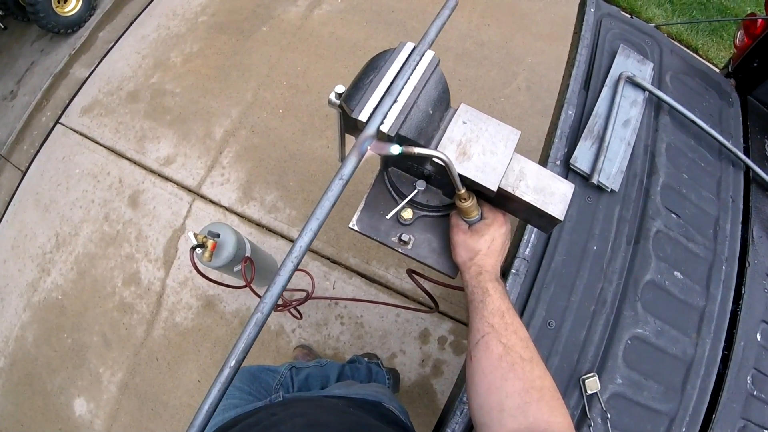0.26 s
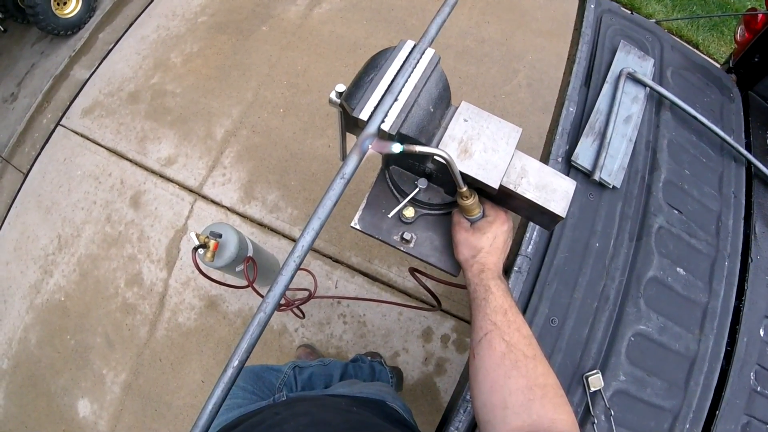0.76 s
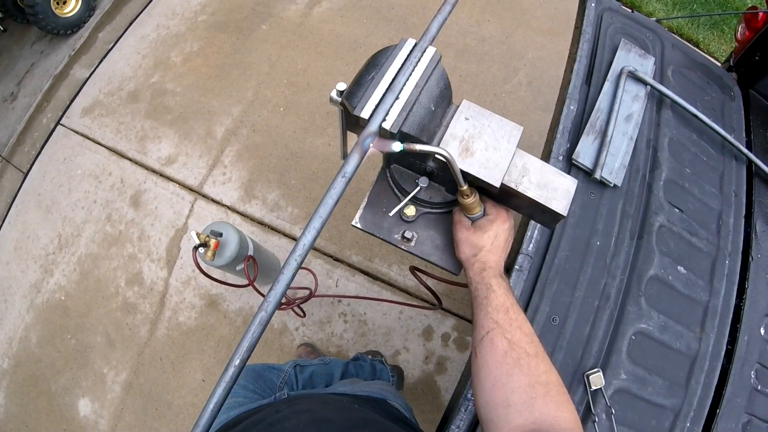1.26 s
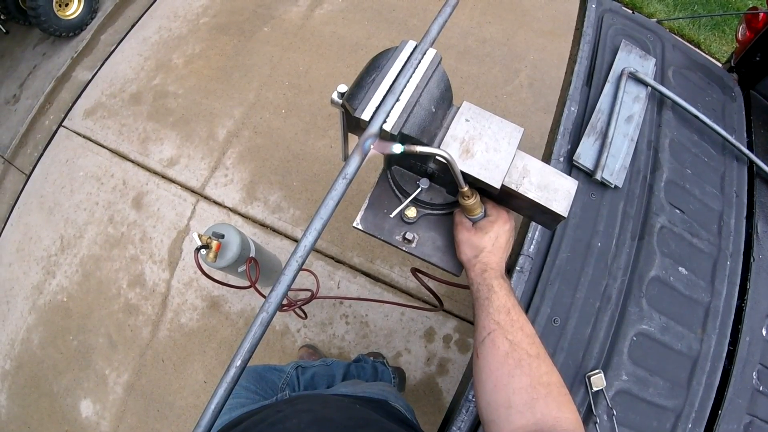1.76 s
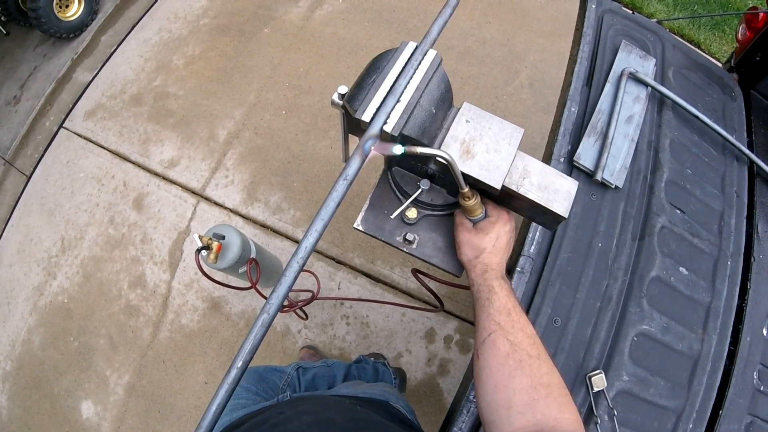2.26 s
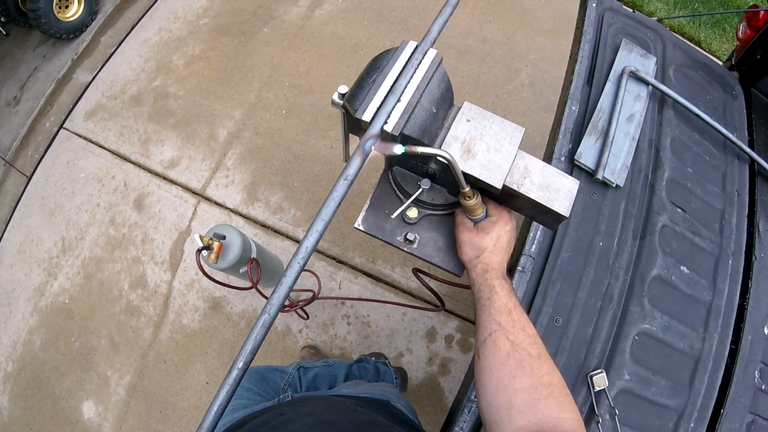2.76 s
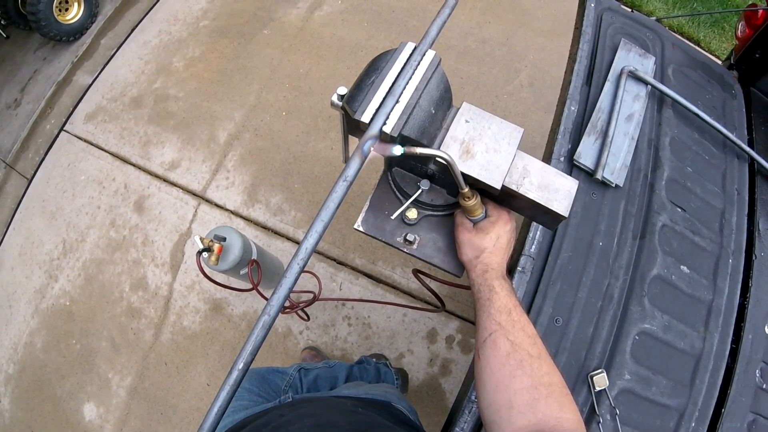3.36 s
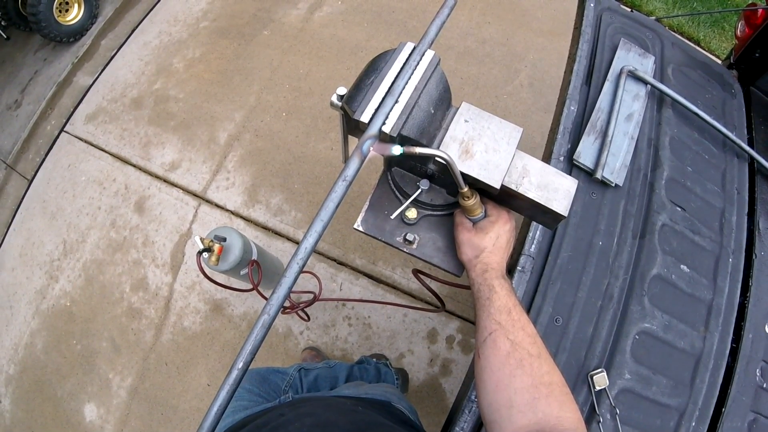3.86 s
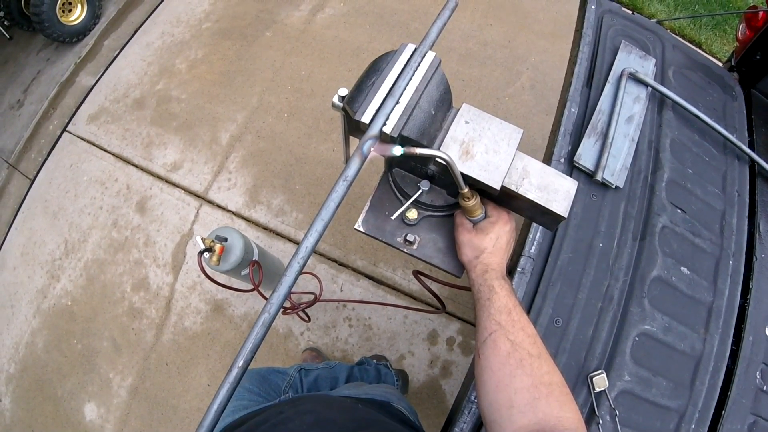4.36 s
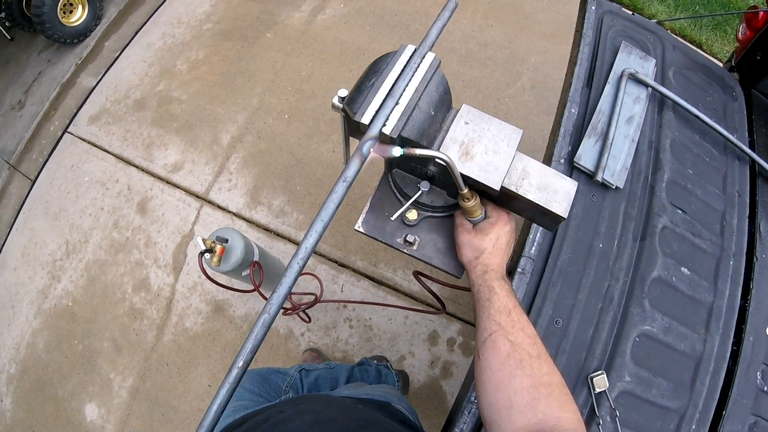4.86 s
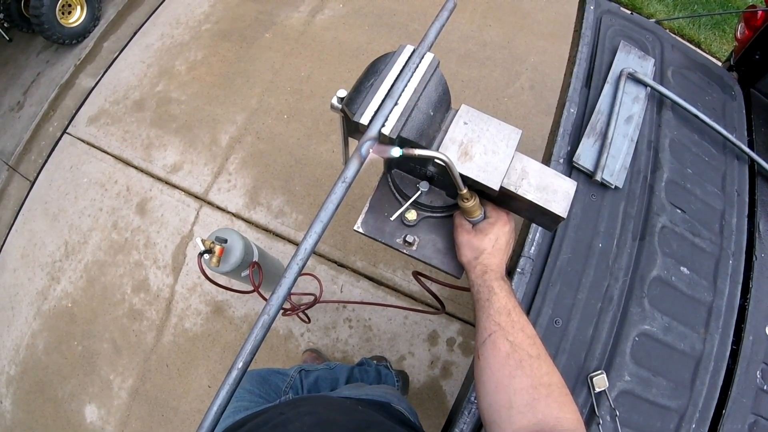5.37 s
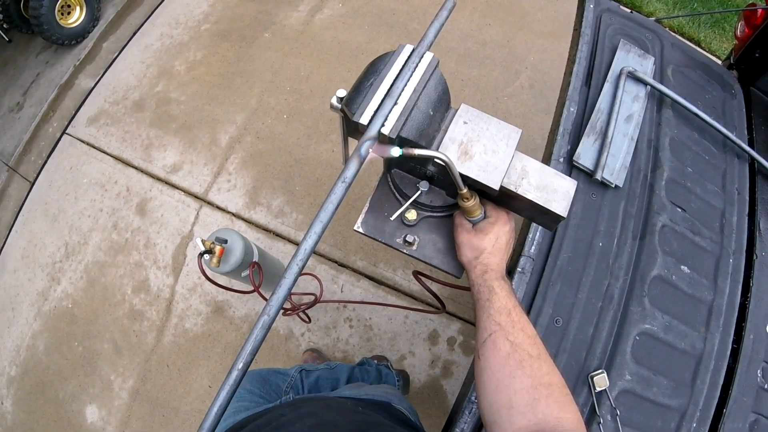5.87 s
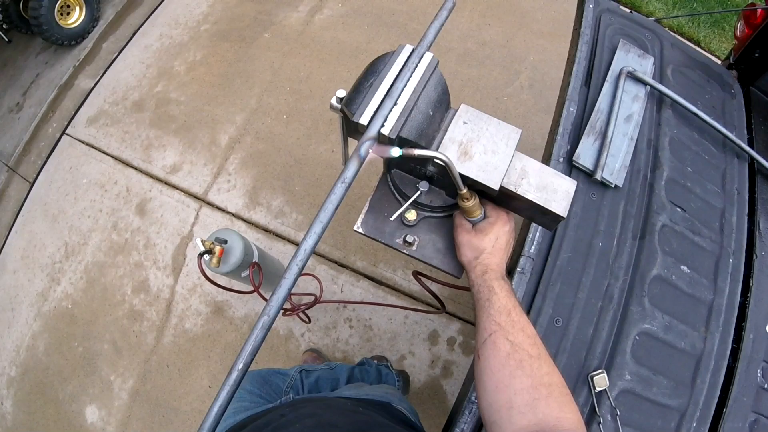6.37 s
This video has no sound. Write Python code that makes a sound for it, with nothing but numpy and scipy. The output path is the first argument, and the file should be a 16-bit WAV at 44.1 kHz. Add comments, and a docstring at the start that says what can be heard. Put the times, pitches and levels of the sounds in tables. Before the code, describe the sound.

A high, raspy whistle sounds without a break from a gas torch heating a steel bar in the open air, heard from an arm's length away. Beneath it the gas jet hisses and the flame roars faintly, with a slight metallic colour. The whistle wavers a little, dips for a moment late on as the hiss dulls, then returns to full strength.

```python
"""Outdoors, an arm's length away, a hand-held gas torch burns steadily against a steel bar.
The flame roars softly, the gas jet hisses, and the jet drives a shrill, rough whistle in the burner tube.
The pitch wanders a little as the hand moves the flame, and sound bouncing off nearby metal colours it all.
Near five seconds the jet falters and the whistle briefly gets quieter."""
import sys
import numpy as np
from scipy import signal
from scipy.fft import rfft, irfft
from scipy.io import wavfile
from scipy.ndimage import uniform_filter1d

SR = 44100
rng = np.random.default_rng(int(sys.argv[2]) if len(sys.argv) > 2 else 0)


def transcribe(signal):
    """Save signal, clipped to [-1, 1], as a 16-bit WAV file at the path in sys.argv[1]."""
    frames = np.atleast_2d(signal).T
    limited = np.clip(frames, -1, 1)
    pcm = np.round(limited * 32767).astype(np.int16)
    wavfile.write(sys.argv[1], SR, pcm)


N = 292383


def undb(db):
    """Turn decibels into a number to multiply a sound by."""
    return 10 ** (np.asarray(db) / 20)


def level(x, db):
    """Scale a sound to an average (rms) level."""
    return x * undb(db) / np.sqrt(np.mean(np.abs(x) ** 2))


def curves(table):
    """Join a table's timed points with straight lines, giving one value per sample."""
    times_s, *columns = np.transpose(table)
    return [np.interp(np.arange(N) / SR, times_s, column) for column in columns]


def wander(steps_per_s):
    """A smooth random wobble with a typical size of 1."""
    hold = max(int(SR / steps_per_s), 2)
    steps = np.repeat(rng.standard_normal(N // hold + 1), hold)
    smoothed = uniform_filter1d(uniform_filter1d(steps, hold), hold)
    return level(smoothed[:N], 0)


def bell(f, centre_hz, width_hz):
    """The hump of a resonance (a pitch where something rings): 1 at its centre, less to each side."""
    return 1 / (1 + (2 * (f - centre_hz) / width_hz) ** 2)


def falter(t, half_length_s=0.12, early_s=0, at_s=5.09):
    """A smooth bump from 0 to 1 and back, peaking early_s before the jet falters."""
    return np.exp(-((t - at_s + early_s) / half_length_s) ** 2)


def turbulence(resonances):
    """Swirling gas makes noise, which is strongest around each resonance."""
    f = np.fft.rfftfreq(N, 1 / SR)
    power = sum((undb(db) * bell(f, hz, width)) ** 2 for hz, width, db in resonances)
    noise_spectrum = rfft(rng.standard_normal(N))
    return level(irfft(noise_spectrum * np.sqrt(power), N), 0)


def metal_reflections(sound, pitch_hz, frame_samples=2048):
    """Echoes off nearby metal cancel some pitches; the treble flares, then dulls as the jet falters."""
    # hollows where the echo cancels the direct sound: pitch_hz, width_hz, base_depth_db (scaled below)
    hollows = [(750, 60, -3), (1680, 80, -8), (3520, 130, -3.5), (4280, 150, -6), (5515, 110, -7),
               (6810, 220, -5), (9420, 350, -4), (10200, 220, -5)]
    f, t, frames = signal.stft(sound, SR, nperseg=frame_samples)
    treble_db = 2.3 * falter(t, half_length_s=0.2, early_s=0.28) - 3.6 * falter(t)
    colour_db = treble_db * bell(f[:, None], centre_hz=9600, width_hz=3600)
    # the hollows slide up and down with the whistle's pitch
    slide = np.interp(t, np.arange(N) / SR, pitch_hz / np.mean(pitch_hz)) ** 1.2
    for hz, width_hz, base_depth_db in hollows:
        # the hand drifts slowly, so the hollows deepen, the high ones fastest
        depth_scale = 1.2 + 0.02 * (hz / 1000) * (t - 3.6)
        colour_db = colour_db + depth_scale * base_depth_db * bell(f[:, None], hz * slide, width_hz)
    return signal.istft(frames * undb(colour_db), SR, nperseg=frame_samples)[1][:N]


def flame_roar(flicker_db=0.36):
    """Burning gas makes a soft noise, coloured by the tube and flickering slightly."""
    # resonances of the flame and burner tube: pitch_hz, width_hz, relative_level_db
    flame_resonances = [(90, 750, -17), (494, 276, -9.5), (622, 145, -9.5), (947, 176, -4.5),
                        (1364, 690, -12), (1910, 320, -10), (2281, 520, -3.5), (2887, 260, 0.5),
                        (3180, 310, -13.5), (3926, 1130, -4)]
    return turbulence(flame_resonances) * undb(flicker_db * wander(steps_per_s=24.82))


def gas_hiss(swing, thinning_db=1.8, flicker_db=0.78):
    """The jet hisses, and thins whenever the whistle swings wide and takes its energy."""
    # resonances of the gas jet in the nozzle: pitch_hz, width_hz, relative_level_db
    jet_resonances = [(4546, 310, 2), (5320, 250, 5.5), (5640, 270, 5), (5907, 460, 8), (6490, 280, 3),
                      (6940, 450, -1.5), (7464, 444, 1.5), (8360, 1720, -11), (9880, 330, -17),
                      (10670, 370, -14), (12050, 410, -35.5)]
    hiss = turbulence(jet_resonances)
    change_db = -thinning_db * np.abs(swing) + flicker_db * wander(steps_per_s=70)
    return level(hiss * undb(change_db), 0)


def whistle_swing(width_hz=420, offset_hz=70, drive=0.78, tube_width_hz=2600):
    """Swirling gas kicks two close resonances of the tube, so the air in it swings unevenly."""
    # complex numbers hold the swing's size and timing; 0 Hz here stands for the whistle's pitch
    f = np.fft.fftfreq(N, 1 / SR)
    kicks = np.fft.fft(rng.standard_normal(N) + 1j * rng.standard_normal(N))
    pair = np.hypot(bell(f, -offset_hz, width_hz) ** 2, bell(f, offset_hz, width_hz) ** 2)
    swing = level(np.fft.ifft(kicks * pair), 0)
    # big swings level off: the jet can only feed so much energy into the tube
    swing = swing / np.sqrt(1 + np.abs(drive * swing) ** 2 / 2)
    return level(np.fft.ifft(np.fft.fft(swing) * bell(f, 0, tube_width_hz)), 0)


def whistle(swing, pitch_hz, flutter_hz=35, octave_db=-52):
    """The tube's note flutters with the hot gas; being driven to its limit adds a faint octave above."""
    fluttering_hz = pitch_hz + flutter_hz * wander(steps_per_s=130)
    tone = swing * np.exp(2j * np.pi * np.cumsum(fluttering_hz) / SR)
    return level(tone.real, 0) + level((tone ** 2).real, octave_db)


def scene():
    """Roar, hiss and whistle come from one spot and reach both channels alike."""
    # the whistle's path as the hand moves the flame on the bar: time_s, pitch_hz
    pitch_path = [(0.0, 4960), (0.2, 5003), (4.36, 5008), (5.28, 4947), (5.76, 5060), (6.63, 5000)]
    t = np.arange(N) / SR
    swing = whistle_swing()
    hiss, roar = gas_hiss(swing), flame_roar()
    pitch_hz = curves(pitch_path)[0] + 9.02 * wander(steps_per_s=4.2)
    waver_db = 0.33 * wander(steps_per_s=4.2)
    # roar and hiss ease off as the torch burns; the roar dips before the whistle does, and for longer
    roar_db = -29.5 - 0.2274 * t + waver_db - 1.7 * falter(t, half_length_s=0.58, early_s=0.25)
    hiss_db = -21.5 - 0.2837 * t + waver_db - 0.8 * falter(t)
    whistle_db = -12 - 4 * falter(t)
    torch = roar * undb(roar_db) + hiss * undb(hiss_db) + whistle(swing, pitch_hz) * undb(whistle_db)
    heard = metal_reflections(torch, pitch_hz)
    return np.array([heard, heard])


def record(dry):
    """A steep filter cuts off the highest treble."""
    cutoff_hz = 11900
    return signal.sosfilt(signal.ellip(10, .1, 80, cutoff_hz, fs=SR, output="sos"), dry)


dry = scene()
out = record(dry)
transcribe(out)
```